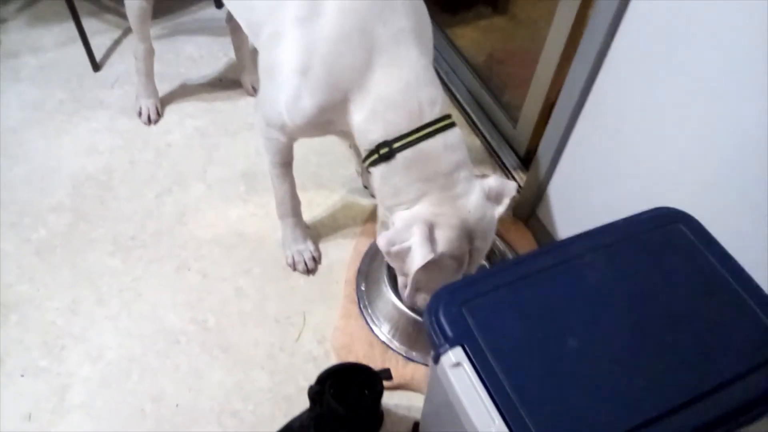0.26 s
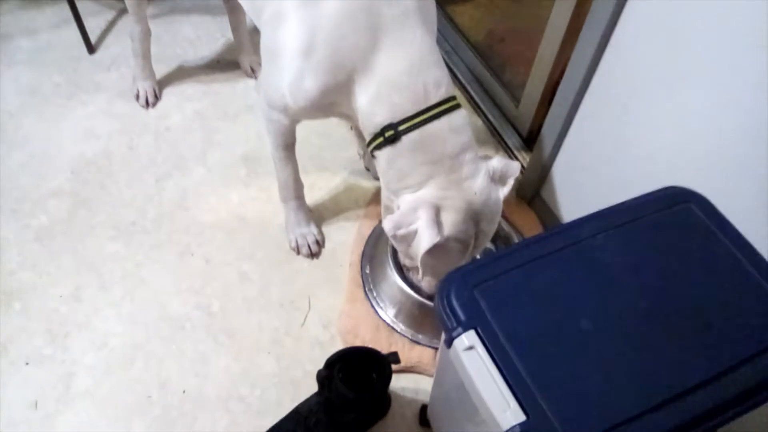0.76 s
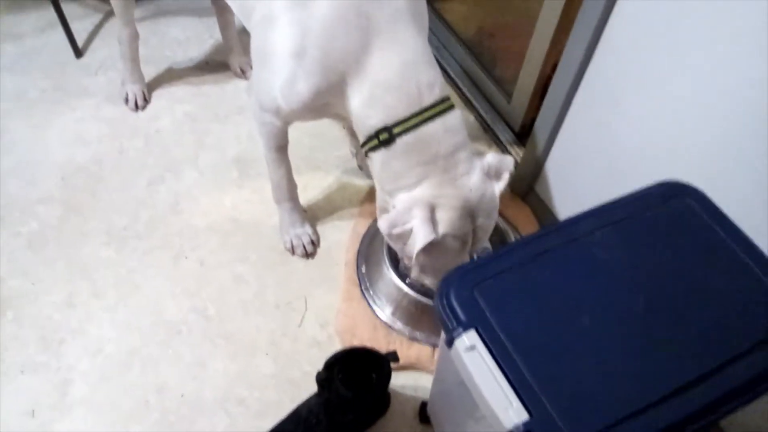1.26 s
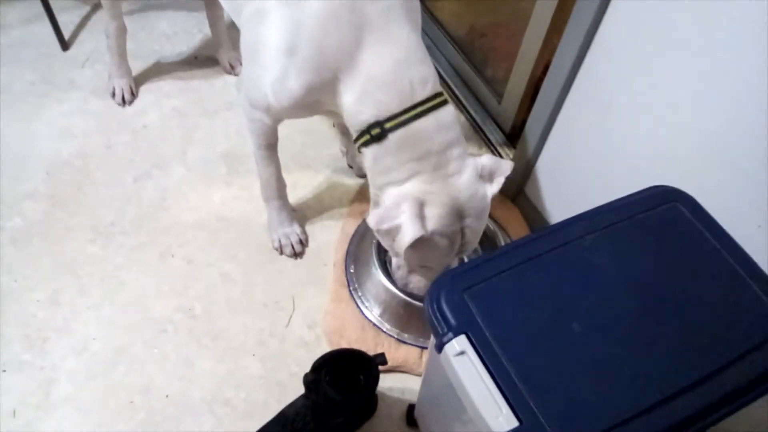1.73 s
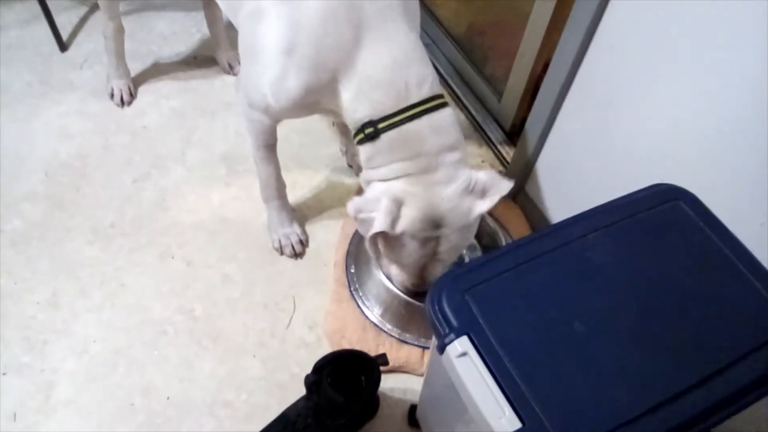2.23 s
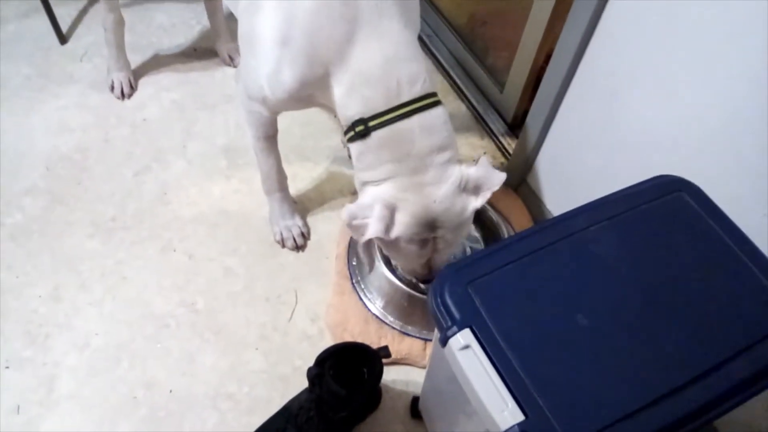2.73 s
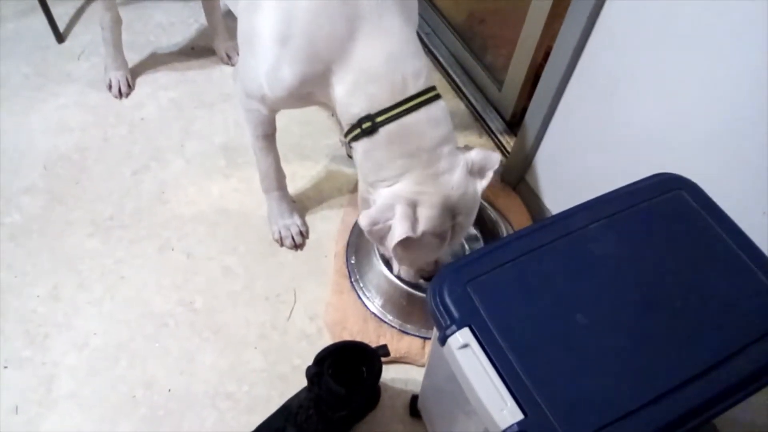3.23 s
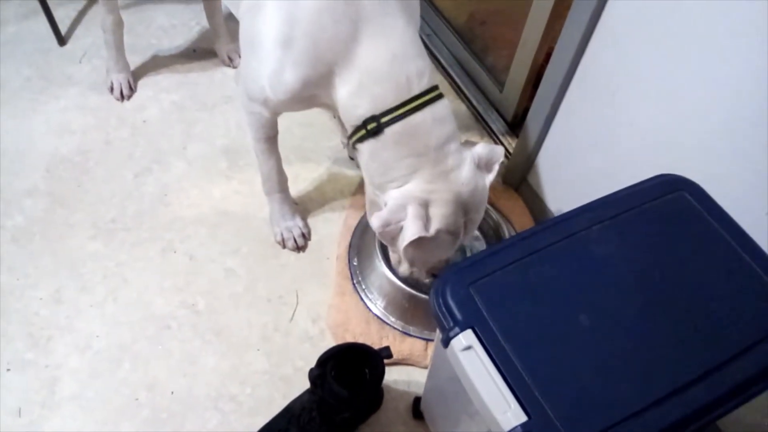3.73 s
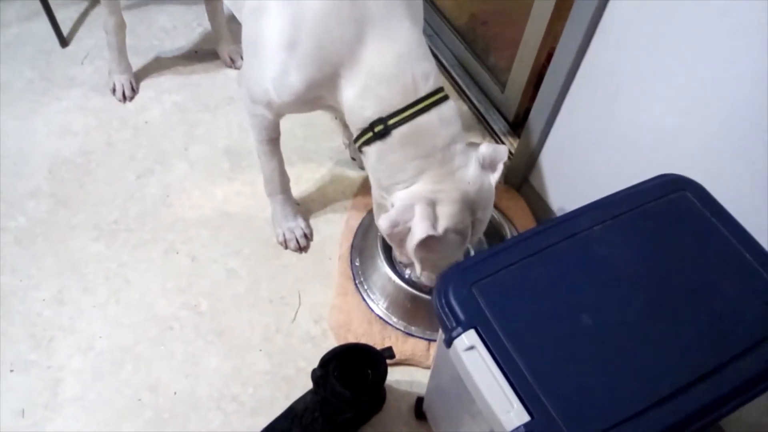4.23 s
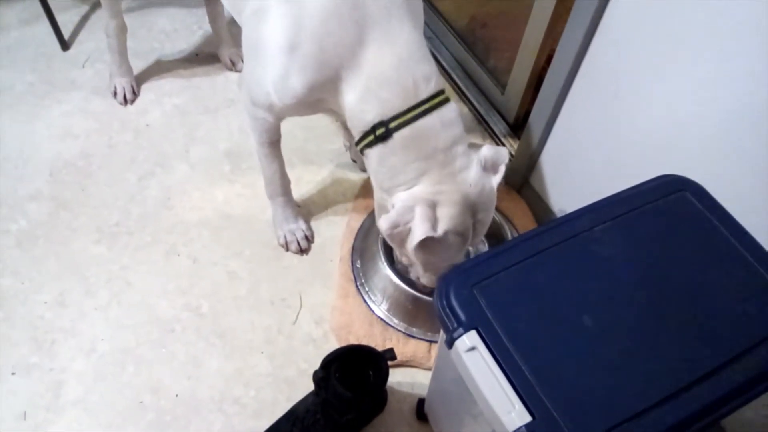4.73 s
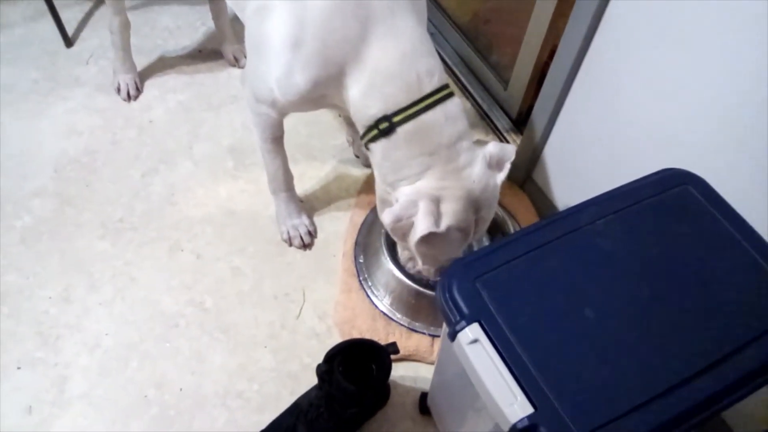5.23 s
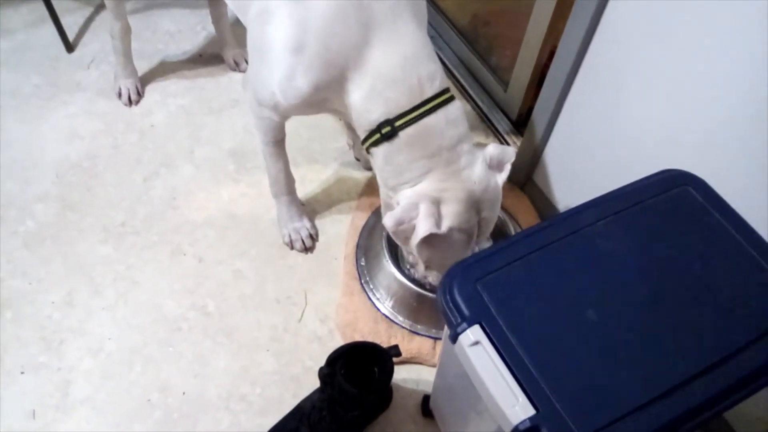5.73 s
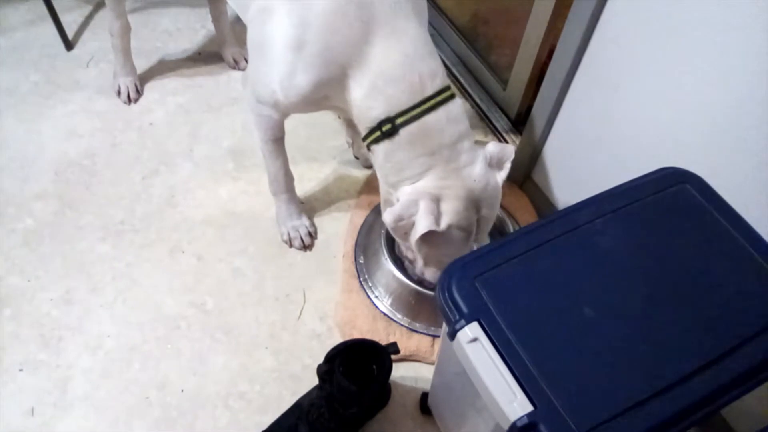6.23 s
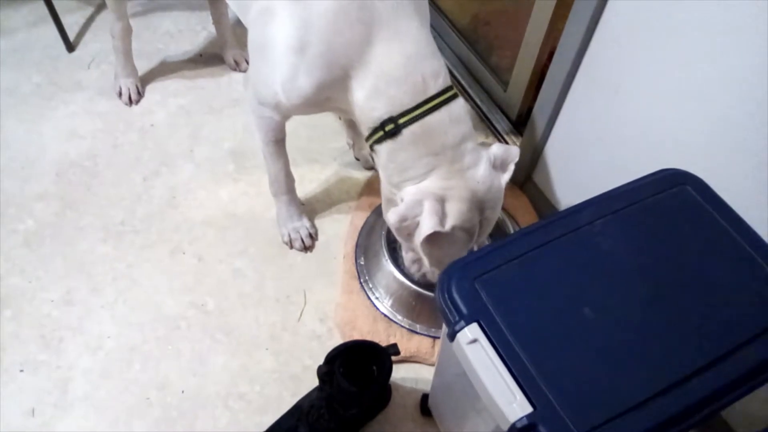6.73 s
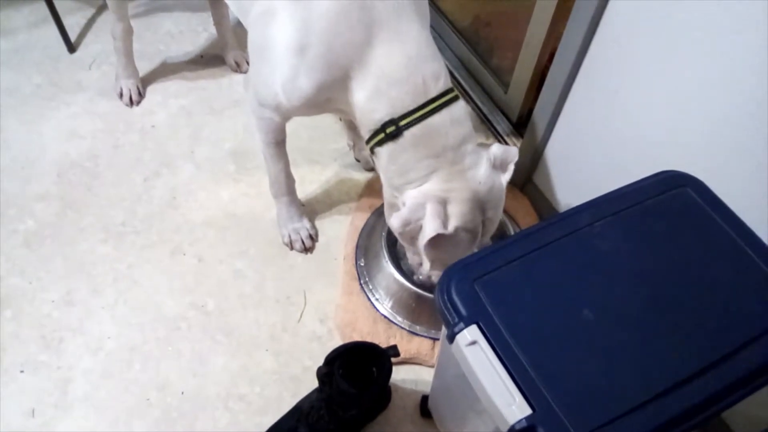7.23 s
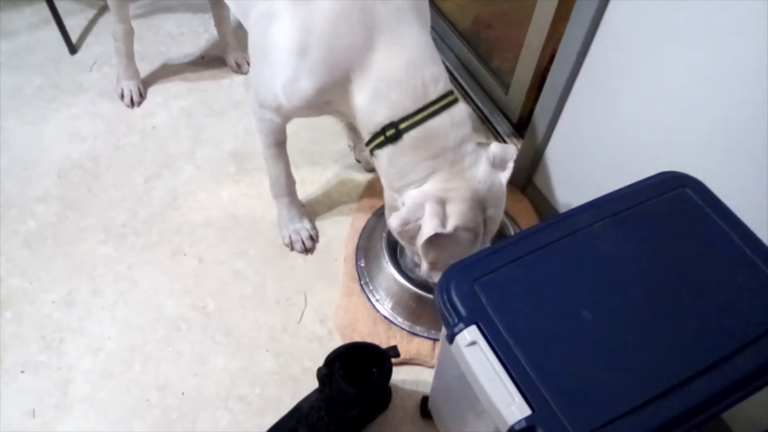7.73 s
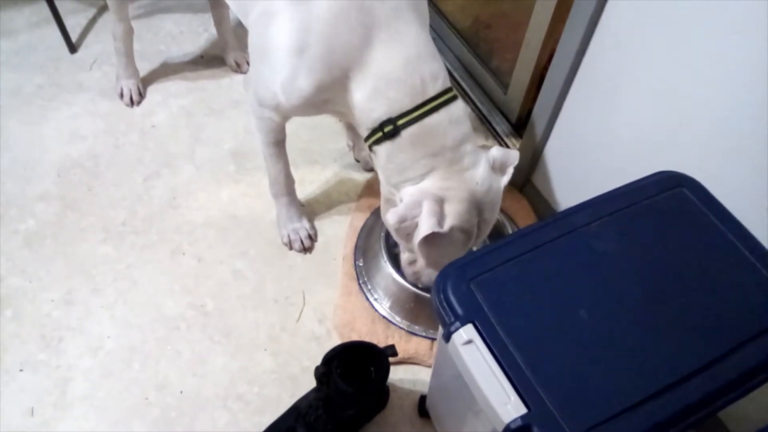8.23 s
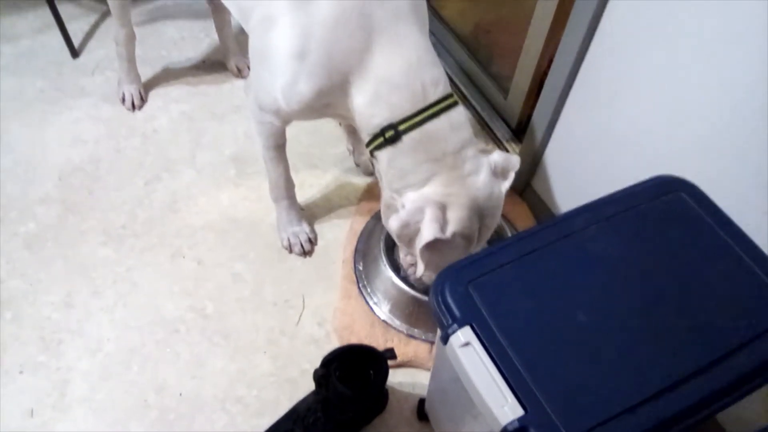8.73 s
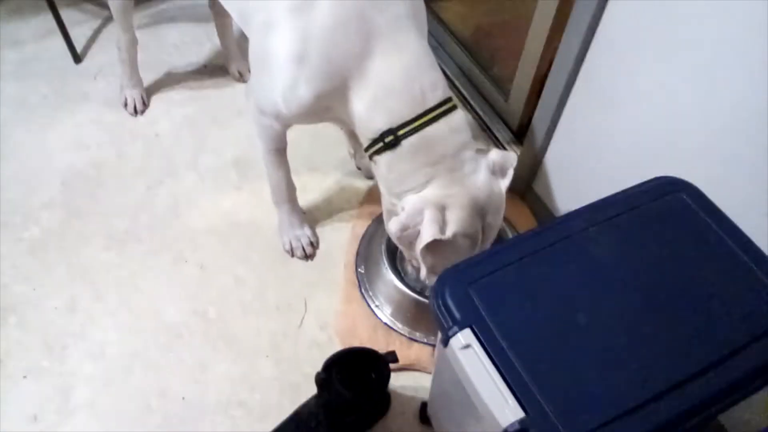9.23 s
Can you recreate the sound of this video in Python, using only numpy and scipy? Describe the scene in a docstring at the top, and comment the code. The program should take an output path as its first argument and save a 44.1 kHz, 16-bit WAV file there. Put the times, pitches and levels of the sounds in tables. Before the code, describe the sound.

A dog laps wet raw meat from a steel bowl on the floor of a small, hard-walled room. At the start a low rumble fades away within a second, leaving a very quiet hush. From about 0.3 s laps come every 0.3 to 0.4 s: a soft sticky lick, a wet crackling peel sinking in pitch, a short hollow plop near 270 Hz, then a moist double jaw smack. Sharp air-pocket pops click near 1.2 s. After a weak lap at 2.2 s the rhythm pauses, with little licks, gurgles and bubbly pops around 2.5 to 2.7 s. Steady lapping resumes at 3.05 s and runs to the end at 9.5 s; a barely audible bowl thud falls at 5.65 s, and plops are bolder around 7.1 s and 8.2 to 9 s. The damped bowl and corner ring faintly, with short reflections, heard close through a dull microphone.

```python
"""A dog laps wet raw meat from a steel bowl, two to three laps a second, in a small hard-walled room.
In each lap the tongue peels away with a wet crackle while the mouth's resonance sinks, the suction lets go
with a hollow plop, and the jaws smack shut. Bubbles and threads of saliva are showers of short rings; air
pockets pop as dying sines; the bowl and the room's corner ring as resonances. Reflections and a short tail
surround the mouth, over a quiet hush and a low rumble that fades at the start, through a dull microphone."""
import sys
import numpy as np
from scipy import signal
from scipy.fft import rfft, irfft
from scipy.io import wavfile
from scipy.ndimage import uniform_filter1d

SR = 44100
rng = np.random.default_rng(int(sys.argv[2]) if len(sys.argv) > 2 else 0)


def output_pcm(signal):
    """Save a mono or channel-first signal as 16-bit PCM at the path in sys.argv[1].

    Samples are clipped to [-1, 1] before scaling.
    """
    pcm = np.clip(np.atleast_2d(signal).T, -1, 1) * 32767
    wavfile.write(sys.argv[1], SR, np.round(pcm).astype(np.int16))


N = 417627
TIME = np.arange(N) / SR  # seconds

# Levels in the tables are relative: most layers add a gain of their own.
# Suction plop of each lap. Each row: release in seconds, level in dB, pitch in Hz, deep boom in dB.
PLOPS = [(0.274, -21, 277, -35), (0.609, -35, 208, -45.5), (0.967, -28.5, 267, -40), (1.377, -26, 270, -44),
         (1.781, -26.5, 277, -44), (2.179, -46.5, 195, -47), (3.052, -26.5, 257, -51),
         (3.39, -23.5, 270, -39.5), (3.719, -28, 267, -43), (4.109, -38, 266, -45),
         (4.454, -28.5, 261, -41), (4.858, -32, 311, -41), (5.19, -25, 270, -36),
         (5.588, -29.5, 272, -41.5), (5.93, -27, 290, -47.5), (6.359, -33, 270, -45.5),
         (6.707, -27.5, 271, -40), (7.122, -17.5, 316, -44), (7.464, -24.5, 293, -40),
         (7.887, -25.5, 271, -47), (8.24, -19.5, 299, -48.5), (8.601, -18, 284, -36),
         (9.012, -21.5, 282, -44), (9.353, -28.5, 257, -46)]
# Tongue strokes, each ending in its lap's plop. Each row: start in seconds, then levels in dB of the
# licking, the peeling, the parting smack and the bloop.
LICKS = [(0.09, -76, -53, -44, -31.5), (0.478, -57, -54.5, -58, -67), (0.76, -57.5, -52.5, -32.5, -36.5),
         (1.29, -65, -50.5, -55, -30.5), (1.61, -60.5, -57, -56, -40), (2.025, -61, -68, -48, -40),
         (2.89, -66, -66.5, -33.5, -42.5), (3.2, -59.5, -56, -36, -34), (3.5, -61, -52, -36, -29.5),
         (3.96, -51, -52, -56, -59), (4.23, -58.5, -55, -32, -26.5), (4.678, -55.5, -53.5, -37.5, -25.5),
         (4.98, -55, -49, -44.5, -55), (5.4, -55, -52, -33, -43), (5.72, -56.5, -55, -35.5, -55),
         (6.14, -55, -51.5, -31.5, -37), (6.5, -57, -55, -26.5, -63), (7.03, -53, -54, -47, -36),
         (7.26, -56, -54.5, -36.5, -39), (7.758, -54, -53, -47, -39), (8.02, -58.5, -53, -37.5, -49),
         (8.41, -55, -56.5, -38.5, -37), (8.92, -59, -55.5, -38.5, -28), (9.19, -56.5, -53, -30.5, -54)]
# Jaws shutting after each plop. Each row: start in seconds, first smack in dB, its resonance in Hz,
# second smack in dB, its resonance in Hz, bright snap in dB, squeezed juice in dB.
JAWS = [(0.303, -30, 2670, -29.5, 2100, -56, -36), (0.645, -23.5, 2370, -30, 2290, -46, -38),
        (1.003, -23, 2420, -35, 2880, -44, -36), (1.409, -30, 1540, -31, 2800, -30.5, -40.5),
        (1.821, -31.5, 2820, -30.5, 2430, -50, -45.5), (2.199, -33.5, 2740, -31.5, 2400, -61, -43),
        (3.083, -42, 1160, -29, 2730, -31.5, -36), (3.427, -26, 2400, -33, 2580, -34, -35.5),
        (3.755, -29.5, 2880, -30.5, 1690, -33.5, -38), (4.142, -24, 2600, -31, 2330, -29.5, -44),
        (4.485, -27, 2700, -47, 2580, -29, -43), (4.884, -36.5, 1620, -21.5, 2600, -31, -38.5),
        (5.222, -20.5, 2900, -26, 1930, -28, -39), (5.617, -19, 2590, -41, 2640, -29.5, -38.5),
        (5.965, -22.5, 2420, -33, 2400, -28.5, -46), (6.39, -26.5, 1110, -27.5, 2040, -31.5, -42),
        (6.736, -25, 2900, -37, 2200, -58, -42), (7.152, -26, 1770, -26.5, 2880, -36, -36.5),
        (7.498, -22.5, 1600, -22.5, 2650, -50, -42), (7.92, -27, 2870, -22, 2450, -75, -40.5),
        (8.276, -32, 2750, -27.5, 2330, -44.5, -37), (8.635, -31.5, 1540, -28, 2610, -66, -34),
        (9.04, -25.5, 1040, -25.5, 2730, -35.5, -38), (9.39, -25, 2580, -31.5, 2300, -35.5, -45.5)]
# The mouth's resonance through one lap. Each row: time from the plop in seconds, frequency in Hz.
STROKE = [(-.26, 1400), (-.16, 1080), (-.09, 820), (-.035, 672), (-.005, 533), (.025, 834), (0.062, 1300),
          (.11, 1420), (.17, 1410)]
# Stray short licks between laps. Each row: start in seconds, length in seconds, level in dB.
STRAY_LICKS = [(0.0, 0.011, -48), (0.095, 0.015, -41.5), (1.212, 0.03, -53), (2.53, 0.06, -58),
               (2.65, 0.058, -51.5), (2.734, 0.021, -53), (5.421, 0.013, -48), (6.547, 0.017, -49.5)]
# Stray lip smacks. Each row: start in seconds, level in dB, mouth resonance in Hz, bright snap in dB.
SMACKS = [(0.0877, -35, 1170, -59), (0.2072, -38.5, 2870, -54), (0.522, -41, 1160, -45),
          (0.8146, -39, 2600, -48), (1.299, -33, 2980, -33.5), (1.5284, -43, 1550, -67),
          (1.712, -36, 2430, -26.5), (2.0228, -38, 2920, -66), (2.1393, -49, 2760, -32),
          (2.508, -41, 2220, -71), (2.5943, -43.5, 2450, -43.5), (2.654, -31, 1100, -35.5),
          (2.732, -34.5, 1730, -52), (2.875, -44.5, 1340, -68), (3.063, -37.5, 1120, -27),
          (3.3267, -62, 2930, -36), (4.0388, -37, 2880, -29.5), (4.3, -34.5, 2800, -62),
          (4.786, -60, 2830, -30), (5.8334, -37.5, 2880, -38.5), (6.2608, -38, 1150, -50),
          (7.0334, -38, 1140, -40), (7.8167, -58.5, 1360, -41), (7.0993, -48, 3020, -27),
          (8.0943, -28, 2450, -32.5), (8.249, -39, 914, -34), (8.517, -38, 1110, -57)]
# Popping air pockets. Each row: start in seconds, level in dB, pitch in Hz, 60 dB decay in seconds,
# sharpness of the burst in dB.
POPS = [(0.31, -27.5, 855, 0.03, -19), (1.213, -18, 2150, 0.014, 6.5), (1.214, -34.5, 912, 0.061, -20),
        (1.221, -13, 2126, 0.0096, -8), (1.231, -18.5, 2153, 0.054, -9), (1.241, -42, 2140, 0.052, -16),
        (1.949, -39.5, 1224, 0.018, -56), (2.336, -47.5, 1770, 0.084, -26), (2.652, -20, 810, 0.019, -31),
        (2.653, -17.5, 1120, 0.014, 4.5), (2.657, -24, 625, 0.05, -28), (2.692, -25, 642, 0.029, -25),
        (2.733, -44, 590, 0.021, 2), (3.553, -27.5, 1126, 0.032, 5.5), (4.022, -37.5, 803, 0.06, -32),
        (5.911, -22, 846, 0.016, -16), (6.740, -23.5, 1026, 0.014, -26), (6.974, -32.5, 2420, 0.04, -19),
        (7.152, -16.5, 411, 0.037, -23.5), (9.207, -37.5, 1080, 0.02, -22)]
# Higher modes of a cavity or air pocket. Each row: multiple of its pitch, level in dB.
OVERTONES = [(1.7, -10), (2.45, -10), (3.0, -7.5), (3.702, -15), (4.5, -11)]
# Soft low gurgles between laps. Each row: start in seconds, length in seconds, level in dB.
GURGLES = [(2.211, 0.063, -57), (2.49, 0.099, -56), (2.703, 0.065, -44.5), (3.205, 0.044, -43.5),
           (3.548, 0.021, -44), (5.986, 0.14, -45.5), (6.109, 0.12, -48)]
# Spectrum of the smacks' body. Each row: frequency in Hz, level in dB.
SMACK_COLOUR = [(150, -39), (450, -14.5), (900, -15), (1500, -0.5), (2700, -2), (3600, -6.5), (7000, -14),
                (15000, -22.5)]
# Spectrum of the saliva's crackle. Each row: frequency in Hz, level in dB.
CRACKLE_COLOUR = [(300, -12), (1000, 5.5), (2000, 3), (2700, 9), (3600, 11), (6500, 13), (15000, 15)]
# Steel bowl damped by the meat. Each row: frequency in Hz, bandwidth in Hz, level in dB.
BOWL = [(1020, 7, -17), (1174.5, 37.5, 9), (2040, 17, -33.5), (2130, 5.2, -38.5), (2508, 20, 6),
        (2713, 63, 2.5), (2880, 8.6, 9)]
# Dull knocks of the bowl. Each row: start in seconds, level in dB, pitch in Hz, 60 dB decay in seconds.
KNOCKS = [(5.650, -39.5, 55.6, 0.12)]
# Low modes of the corner around the bowl. Each row: frequency in Hz, level in dB, 60 dB decay in seconds.
CORNER = [(124.2, -16.5, 0.22), (146, -11.5, 0.24), (172, -7, 0.093), (210.2, -7.5, 0.17), (270, -14, 0.23),
          (289.6, -9, 0.22), (337.6, -19, 0.38), (371.3, -15, 0.31), (420, -25, 0.37), (480, -35, 0.49),
          (556, -14, 0.27), (634, -21, 0.26), (846, -20.5, 0.28)]
# Near reflections off floor, wall and bin. Each row: nominal delay in seconds, level in dB.
ECHOES = [(.0027, -16), (.0066, -15), (.0098, -14), (0.0166, -11)]
# Decay of the room's tail. Each row: frequency in Hz, 60 dB decay in seconds.
ROOM_T60 = [(200, 0.3), (700, 0.31), (1400, 0.25), (3000, 0.31), (7000, 0.22), (15000, 0.042)]
# Strength of the diffuse tail, weak in the bass where single modes take over.
# Each row: frequency in Hz, level in dB.
TAIL_COLOUR = [(150, -5.5), (500, -4), (1000, 1.5), (15000, -2.5)]
# Spectrum of the quiet room. Each row: frequency in Hz, level in dB.
HUSH = [(30, -6), (120, 5), (500, -13), (1000, 0), (2500, -2), (5000, -6), (9000, 2), (12500, 8),
        (16000, 8)]
# Spectrum of the low rumble. Each row: frequency in Hz, level in dB.
RUMBLE_COLOUR = [(25, -16), (60, -2.5), (140, 0), (220, -2.5), (350, -8), (700, -19), (2000, -13.5),
                 (8000, -32)]
# Fading of the low rumble. Each row: time in seconds, level in dB.
RUMBLE = [(0, -42), (.45, -48.5), (.7, -53.5), (.9, -62), (1.3, -62), (2.0, -70.5), (2.7, -73.5),
          (9.47, -73.5)]
# Response of the microphone. Each row: frequency in Hz, level in dB.
MICROPHONE = [(30, 0), (5500, -8.5), (6700, -7.5), (7400, -17.5), (8400, -23), (10500, -26), (12500, -34),
              (14000, -28), (15300, -16.5), (16000, -31.5)]
CUTOFF_HZ = 15900

# the tongue parts from the meat just before the plop, and a bubble bloops in the gap
PARTING_LEAD_S, PARTING_HZ, PARTING_SNAP_DB = .022, 2900, -1.5
BLOOP_LEAD_S, BLOOP_HZ, BLOOP_T60_S, BLOOP_SHARP_DB = .015, 589, 0.031, -32
# the jaws shut in two smacks, the second one with a weaker snap
SECOND_SMACK_S, SECOND_SNAP_DB = .015, -7.5
# a small click of the tongue follows each bite at a random moment, on average louder after a juicy one
CLICK_FROM_S, CLICK_TO_S = .09, .18
CLICK_DB, CLICK_SPREAD_DB, CLICK_HZ, CLICK_SNAP_DB = -4, 4.5, 2400, -22.5


def saliva(lick_db=-5, muffle_hz=5000, squeeze_db=-8, squish_db=-6, squish_low_hz=380, squish_high_hz=950):
    """Squelch all through the lap; crackle muffled in licking, bright in peeling; a low squish of the jaws."""
    licking, peeling, squeezing = tongue()
    bubbles = squelch(to_db(licking + squeezing), stroke())

    muffle = signal.butter(2, muffle_hz, fs=SR, output="sos")
    muffled = signal.sosfilt(muffle, crackle(to_db(licking) + lick_db, per_s=700, cycles=20))
    bright = crackle(to_db(peeling + from_db(squeeze_db) * squeezing))

    pulp = signal.butter(2, [squish_low_hz, squish_high_hz], "band", fs=SR, output="sos")
    pressed = rms_one(signal.sosfilt(pulp, grains(per_s=710, spread_db=13.5)))
    squish = from_db(squish_db) * squeezing * pressed
    return bubbles + muffled + bright + squish


def tongue(lick_rise_s=0.028, peel_s=0.064, peel_rise_s=0.03, squeeze_s=0.011, squeeze_rise_s=0.01,
           fall_db_per_s=550, linger_db=-18, linger_db_per_s=110, lick_uneven_db=3.0, peel_uneven_db=3):
    """Gains of a lap's phases: the tongue licks softly, it peels off in jerks, the jaws squeeze out juice."""
    licking, peeling, squeezing = np.zeros((3, N))
    for (plop_s, *_), (start_s, lick_db, peel_db, _, _), (shut_s, *_, juice_db) in zip(PLOPS, LICKS, JAWS):
        lick_s = max(plop_s - start_s, 0)
        licking += swell(start_s, lick_s, lick_db, lick_rise_s, fall_db_per_s)
        peeling += swell(plop_s - peel_s, peel_s, peel_db, peel_rise_s, fall_db_per_s)
        squeezing += swell(shut_s, squeeze_s, juice_db, squeeze_rise_s, fall_db_per_s)
        # the tongue keeps moving after the bite
        licking += swell(shut_s, squeeze_s, juice_db + linger_db, squeeze_rise_s, linger_db_per_s)
    for s, length_s, db in STRAY_LICKS:
        licking += swell(s, length_s, db, squeeze_rise_s, fall_db_per_s)
    uneven_licking = licking * from_db(lick_uneven_db * wander())
    jerky_peeling = peeling * from_db(peel_uneven_db * wander(per_s=60))
    return uneven_licking, jerky_peeling, squeezing


def stroke(handover_s=.17):
    """The mouth's resonance in Hz at every sample, timed from the plop of the current lap."""
    plop_s = np.array(PLOPS)[:, 0]
    lap = np.searchsorted(plop_s + handover_s, TIME)
    lap = np.minimum(lap, len(plop_s) - 1)
    return np.interp(TIME - plop_s[lap], *np.transpose(STROKE))


def squelch(level_db, mouth_hz, per_s=230, cycles=20, scatter=0.065, gain_db=1, glide=0.098):
    """Tiny bubbles burst on the tongue and ring near the moving resonance of the mouth."""
    out = np.zeros(N)
    ticks = grains(per_s, spread_db=1.5)
    for i in np.flatnonzero(ticks):
        hz = mouth_hz[i] * np.exp(scatter * rng.normal())
        ring = unit_energy(ping(hz, cycles / hz, rise_s=0.00029, glide=glide))
        add(out, TIME[i], ticks[i] * from_db(level_db[i] + gain_db) * ring)
    return out


def crackle(level_db, per_s=600, cycles=22, gain_db=6, tick_db=-5, glide=0.024):
    """Threads of saliva snap, each with a tick and a short ring at a pitch of its own."""
    ticks = grains(per_s, spread_db=8.5) * from_db(level_db + gain_db)
    out = from_db(tick_db) * ticks
    for i in np.flatnonzero(ticks):
        hz = 1300 * 10 ** rng.random()  # anywhere in the decade above 1300 Hz
        ring = unit_energy(ping(hz, cycles / hz, rise_s=.0001, glide=glide))
        add(out, TIME[i], ticks[i] * ring)
    return coloured(out, CRACKLE_COLOUR)


def plops(t60=0.012, rise_s=0.0058, lag_s=0.003255, direct_db=22, cluck_db=-1,
          corner_db=8, deep_db=9, corner_lag_s=0.00879, corner_rise_s=0.0075):
    """The mouth cavity rings for a few cycles as suction lets go, and sets the corner's modes booming."""
    cavity, boom = np.zeros(N), np.zeros(N)
    for s, db, hz, boom_db in PLOPS:
        add(cavity, s + lag_s, from_db(db + direct_db) * ping(hz, t60, rise_s))
        for multiple, mode_db in OVERTONES:
            cluck_gain = from_db(db + cluck_db + mode_db + rng.normal(0, 5.0))
            cluck_hz = multiple * hz * np.exp(rng.normal(0, 0.017))
            add(cavity, s + lag_s, cluck_gain * ping(cluck_hz, 0.023, 0.0017))
        # the blow's spectrum: the deep boom below, a slow fall above the plop's own pitch
        blow = [(143, boom_db + deep_db), (max(hz, 200), db), (900, db - 3.5)]
        for k, (mode_hz, mode_db, mode_t60) in enumerate(CORNER):
            strength_db = at_hz(blow, mode_hz) + corner_db + mode_db + rng.normal(0, 4.3)
            sign = (-1) ** k
            add(boom, s + corner_lag_s, sign * from_db(strength_db) * ping(mode_hz, mode_t60, corner_rise_s))
    # a small opening radiates little bass
    thin = signal.butter(3, 115, "high", fs=SR, output="sos")
    return signal.sosfilt(thin, cavity), signal.sosfilt(thin, boom)


def smacks(burst_t60=0.02, spray_t60=0.039, first_tick_db=-7, width_hz=380, broad_db=-3, cavity_db=-2,
           cavity_width_hz=150, body_db=27, snap_db=32, snap_hz=4200, sizzle_db=11,
           spray_rise_s=.002, burst_rise_s=0.00084):
    """A wet film tears in a burst of ticks: a bright snap, and a body ringing in the mouth's pockets."""
    body, snap = np.zeros(N), np.zeros(N)
    t = TIME[:SR // 20]
    ticks = grains(per_s=1200, spread_db=3.0)
    bright = signal.butter(2, snap_hz, "high", fs=SR, output="sos")
    for k, (s, db, hz, bright_db) in enumerate(lap_smacks()):
        own_ticks = ticks[k * len(t):(k + 1) * len(t)]
        burst = unit_energy(own_ticks * from_db(-60 * t / burst_t60) * (1 - np.exp(-t / burst_rise_s)))
        burst = unit_energy(burst + from_db(first_tick_db) * (t == 0))  # one sharp tick leads
        # the finest ticks go on longer
        spray = unit_energy(own_ticks * from_db(-60 * t / spray_t60) * (1 - np.exp(-t / spray_rise_s)))

        pockets_hz = np.geomspace(950, 3300, num=4) * np.exp(rng.normal(0, 0.173, 4))
        pockets = sum(resonate(burst, pocket_hz, cavity_width_hz) for pocket_hz in pockets_hz)
        ringing = unit_energy(resonate(burst, hz, width_hz)) + from_db(cavity_db) * unit_energy(pockets)
        add(body, s, from_db(db + body_db) * (ringing + from_db(broad_db) * burst))

        sizzle = spray + from_db(sizzle_db) * resonate(spray, rng.uniform(4600, 6750), 160)
        add(snap, s, from_db(bright_db + snap_db) * unit_energy(signal.sosfilt(bright, sizzle)))
    return coloured(body, SMACK_COLOUR) + snap


def lap_smacks():
    """Rows like SMACKS: tongue parting, jaws shutting twice and a small click in each lap, then the strays."""
    rows = []
    for plop, lick, jaw in zip(PLOPS, LICKS, JAWS):
        parting_db = lick[3]
        shut_s, first_db, first_hz, second_db, second_hz, snap_db, juice_db = jaw
        click_s = shut_s + CLICK_FROM_S + (CLICK_TO_S - CLICK_FROM_S) * rng.random()
        click_db = juice_db + CLICK_DB + CLICK_SPREAD_DB * rng.normal()
        click_hz = CLICK_HZ * np.exp(0.39 * rng.normal())
        rows += [(plop[0] - PARTING_LEAD_S, parting_db, PARTING_HZ, parting_db + PARTING_SNAP_DB),
                 (shut_s, first_db, first_hz, snap_db),
                 (shut_s + SECOND_SMACK_S, second_db, second_hz, snap_db + SECOND_SNAP_DB),
                 (click_s, click_db, click_hz, juice_db + CLICK_SNAP_DB)]
    return rows + list(SMACKS)


def pops(level_db=4, glide=-0.1, sharp_rise_s=0.00038, soft_rise_s=0.0047):
    """Air pockets ring and sink in pitch; a sharp burst wakes higher modes, a soft one swells to a bloop."""
    out = np.zeros(N)
    for s, db, hz, t60, sharp_db in list(POPS) + bloops():
        rise_s = np.interp(sharp_db, [-30, -15], [soft_rise_s, sharp_rise_s])
        tone = ping(hz, t60, rise_s, glide)
        add(out, s, from_db(db + level_db) * tone / np.max(abs(tone)))
        for multiple, mode_db in OVERTONES:
            mode = ping(multiple * hz, t60 / 2, rise_s=0.00014, glide=glide)
            add(out, s, from_db(db + level_db + sharp_db + mode_db) * mode)
    return out


def bloops():
    """The soft bubble ahead of each plop, in rows like POPS."""
    return [(plop[0] - BLOOP_LEAD_S, lick[-1], BLOOP_HZ, BLOOP_T60_S, BLOOP_SHARP_DB)
            for plop, lick in zip(PLOPS, LICKS)]


def gurgles(level_db=6, low_hz=320, high_hz=620, width_hz=110, high_db=-6):
    """Juice shifts deep in the closed mouth: dense soft ticks through two muffled resonances."""
    ticks = grains(per_s=3000, spread_db=9.0)
    level = np.zeros(N)
    for s, length_s, db in GURGLES:
        add(level, s, from_db(db + level_db) * np.sqrt(np.hanning(int(length_s * SR))))
    hollow = resonate(ticks, low_hz, width_hz) + from_db(high_db) * resonate(ticks, high_hz, width_hz)
    muffle = signal.butter(2, [200, 900], "band", fs=SR, output="sos")
    return level * rms_one(signal.sosfilt(muffle, hollow))


def bowl(x, level_db=-3):
    """The mouth's sounds set the steel bowl's modes ringing."""
    return sum(from_db(db + level_db) * resonate(x, hz, width_hz) for hz, width_hz, db in BOWL)


def knocks(level_db=6):
    """The nudged bowl thuds on its mat: a low dying sine."""
    out = np.zeros(N)
    for s, db, hz, t60 in KNOCKS:
        add(out, s, from_db(db + level_db) * ping(hz, t60, rise_s=0.0088))
    return out


def room(x, count=5):
    """The head shifts from lap to lap, so successive laps meet the room by slightly different paths."""
    lap = np.searchsorted(np.array(PLOPS)[:, 0] + 0.1464, TIME)
    out = np.zeros(N)
    for k in range(count):  # the responses take turns, with short crossfades
        turn = uniform_filter1d(1. * (lap % count == k), size=400)
        out += signal.oaconvolve(x * turn, room_response())[:N]
    return out


def room_response(tail_db=2, build_s=0.00017):
    """Direct sound, near reflections, and a diffuse tail whose decay time depends on frequency."""
    t = TIME[:SR // 2]
    white, tail = rfft(rng.standard_normal(len(t))), np.zeros(len(t))
    bins_hz = np.arange(len(white)) * SR / len(t)
    edges_hz = np.geomspace(100, 17000, num=16)
    for low, high in zip(edges_hz, edges_hz[1:]):
        band = irfft(white * ((bins_hz >= low) & (bins_hz < high)), len(t))
        hz = np.sqrt(low * high)
        dying = from_db(-60 * t / at_hz(ROOM_T60, hz)) * (1 - np.exp(-t / build_s))
        tail += from_db(at_hz(TAIL_COLOUR, hz)) * np.sqrt(high - low) * unit_energy(band * dying)
    response = from_db(tail_db) * unit_energy(tail)
    response[0] += 1
    for s, db in ECHOES:
        response[round(s * SR * rng.uniform(.95, 1.05))] += from_db(db)
    return unit_energy(response)


def background(hush_db=-59, rumble_db=5):
    """The quiet of the room and a low rumble, each a coloured noise."""
    hush = from_db(hush_db) * rms_one(coloured(rng.standard_normal(N), HUSH))
    fading = from_db(np.interp(TIME, *np.transpose(RUMBLE)) + rumble_db)
    return hush + fading * rms_one(coloured(rng.standard_normal(N), RUMBLE_COLOUR))


def from_db(db):
    """Decibels to gain."""
    return 10 ** (np.asarray(db) / 20)


def to_db(gain):
    """Gain to decibels."""
    return 20 * np.log10(gain + 1e-9)


def rms_one(x):
    """Scale to rms 1."""
    return x / np.sqrt(np.mean(x ** 2) + 1e-20)


def unit_energy(x):
    """Scale to a total energy of 1."""
    return x / np.sqrt(np.sum(x ** 2) + 1e-20)


def at_hz(points, hz):
    """Read a table on a log-frequency axis."""
    points_hz, values = np.transpose(points)
    return np.interp(np.log(np.maximum(hz, 1)), np.log(points_hz), values)


def add(track, s, sound):
    """Mix a sound into a track from time s in seconds."""
    start = int(np.clip(round(s * SR), 0, N - 1))
    track[start:start + len(sound)] += sound[:N - start]


def swell(start_s, hold_s, db, attack_s, fall_db_per_s):
    """Gain at every sample: a rise that ends at start_s, a hold, then a steady fall in dB."""
    gain = np.zeros(N)
    t = TIME[:int((attack_s + hold_s + 60 / fall_db_per_s) * SR)]
    fall_db = fall_db_per_s * np.maximum(t - attack_s - hold_s, 0)
    add(gain, start_s - attack_s, np.minimum(t / attack_s, 1) * from_db(db - fall_db))
    return gain


def wander(per_s=25):
    """Slow chance with a spread of about 1: random values joined by straight lines."""
    knots = rng.standard_normal(2000)
    return np.interp(TIME * per_s, np.arange(len(knots)), knots)


def grains(per_s, spread_db):
    """Random ticks of uneven size; rms 1."""
    sizes = from_db(spread_db * np.minimum(rng.exponential(1, N), 3)) * rng.choice([-1, 1], N)
    return rms_one(sizes * (rng.random(N) < per_s / SR))


def ping(hz, t60, rise_s, glide=0):
    """A dying sine whose pitch moves by the share glide over its life."""
    t = TIME[:int(t60 * SR) + 2]
    tone = np.sin(2 * np.pi * hz * t * (1 + glide * t / t60 / 2))
    return tone * from_db(-60 * t / t60) * (1 - np.exp(-t / rise_s))


def resonate(x, hz, width_hz):
    """One resonance with a gain of about 1 on top."""
    r = np.exp(-np.pi * width_hz / SR)
    poles = [1, -2 * r * np.cos(2 * np.pi * hz / SR), r * r]
    return signal.lfilter([(1 - r * r) / 2, 0, (r * r - 1) / 2], poles, x)


def coloured(x, spectrum, size=4096):
    """Causal (minimum-phase) filter with the given spectrum, by folding its cepstrum."""
    bins_hz = np.arange(size // 2 + 1) * SR / size
    cepstrum = irfft(np.log(from_db(at_hz(spectrum, bins_hz))))
    cepstrum[1:size // 2] *= 2
    cepstrum[size // 2 + 1:] = 0
    return signal.fftconvolve(x, irfft(np.exp(rfft(cepstrum))))[:len(x)]


def scene():
    """The mouth's sounds, the bowl and the room around them, over the background."""
    plop, boom = plops()
    mouth = smacks() + pops() + gurgles() + saliva()
    in_room = room(mouth + from_db(11) * plop)
    return (plop + boom + knocks() + bowl(mouth) + in_room + background())[None]


def record(dry):
    """A small microphone, dull above 7 kHz with a resonance near the top, then a steep cut."""
    heard = coloured(dry[0], MICROPHONE)
    steep_cut = signal.ellip(10, .1, 80, CUTOFF_HZ, fs=SR, output="sos")
    return signal.sosfilt(steep_cut, heard)[None]


dry = scene()
out = record(dry)
output_pcm(out)
```